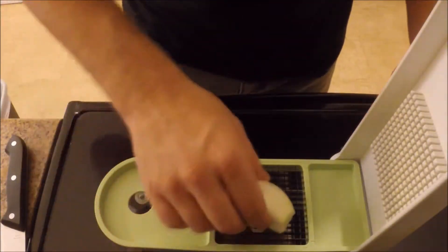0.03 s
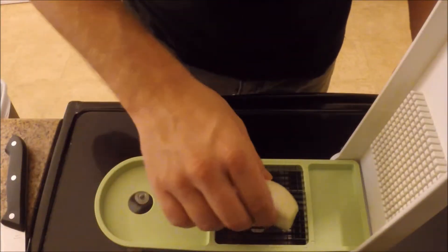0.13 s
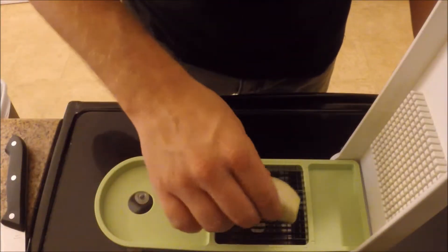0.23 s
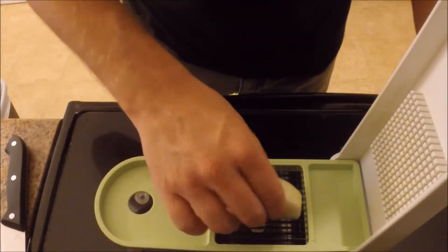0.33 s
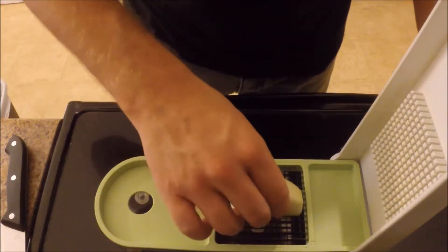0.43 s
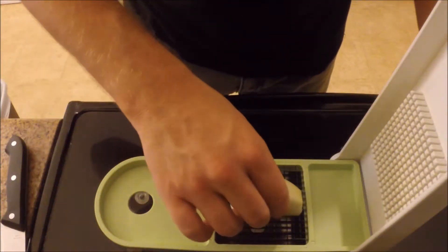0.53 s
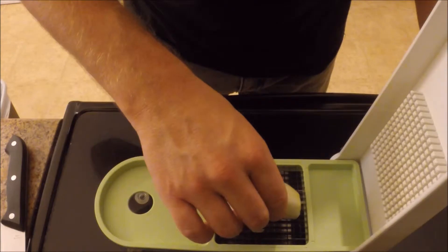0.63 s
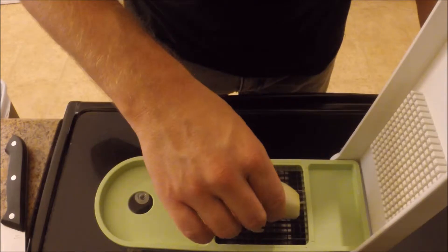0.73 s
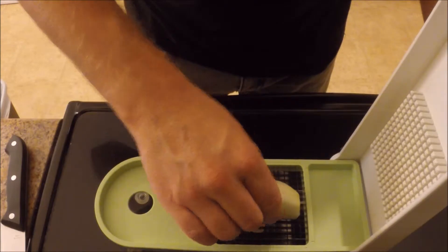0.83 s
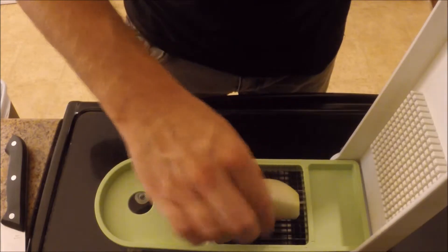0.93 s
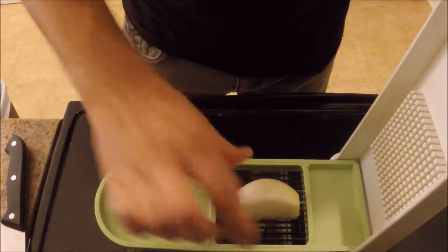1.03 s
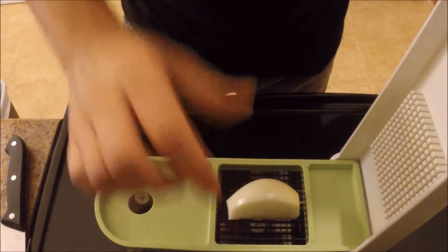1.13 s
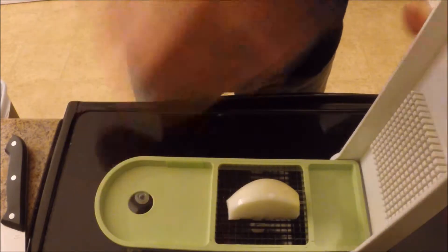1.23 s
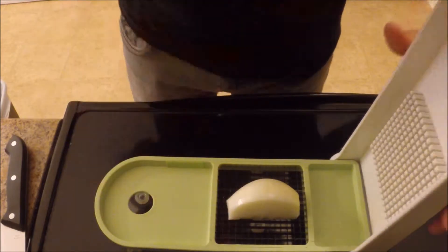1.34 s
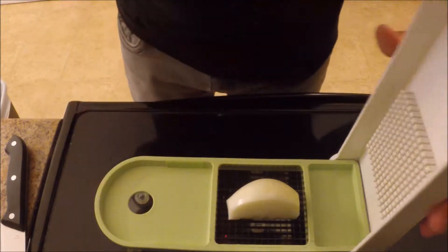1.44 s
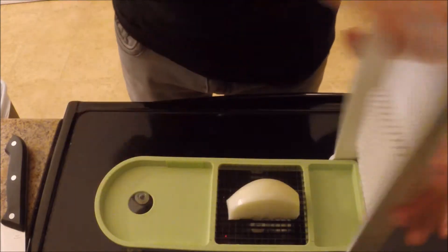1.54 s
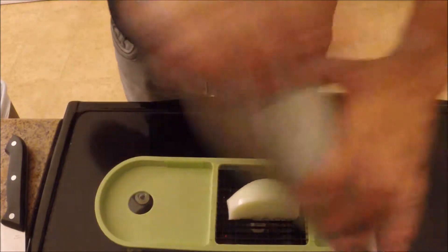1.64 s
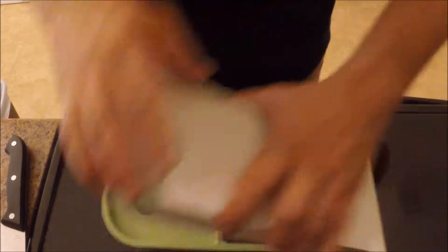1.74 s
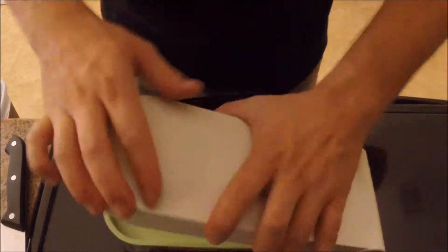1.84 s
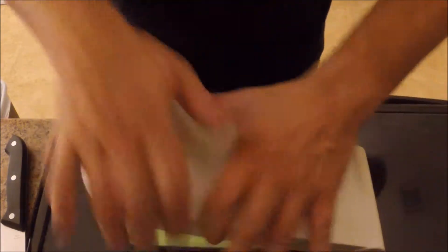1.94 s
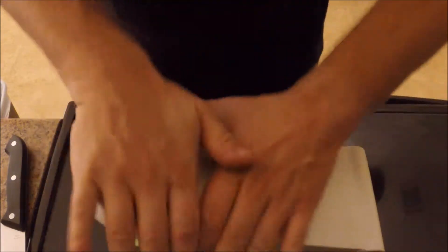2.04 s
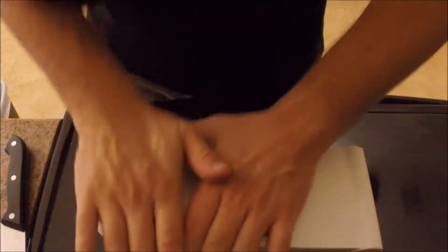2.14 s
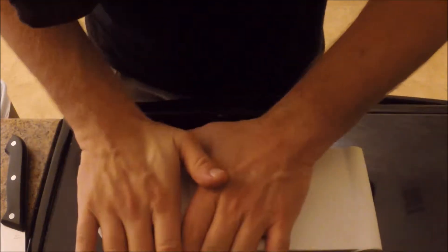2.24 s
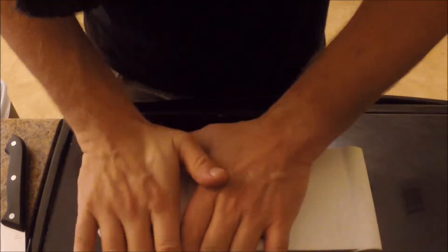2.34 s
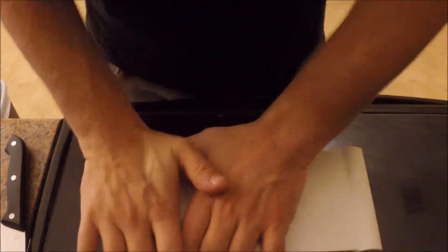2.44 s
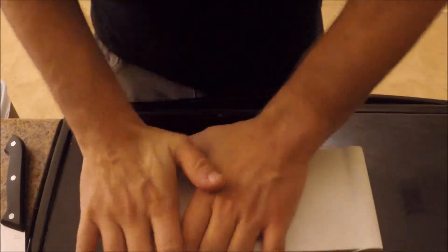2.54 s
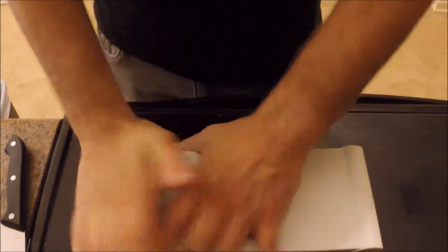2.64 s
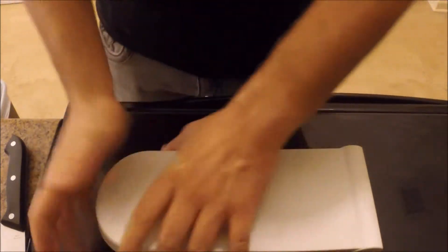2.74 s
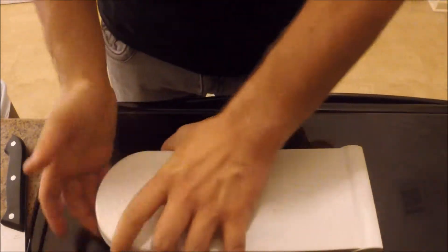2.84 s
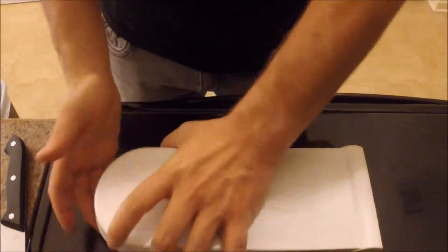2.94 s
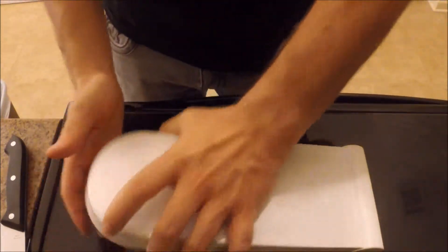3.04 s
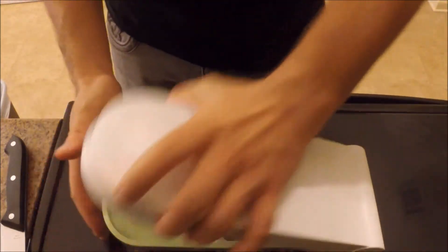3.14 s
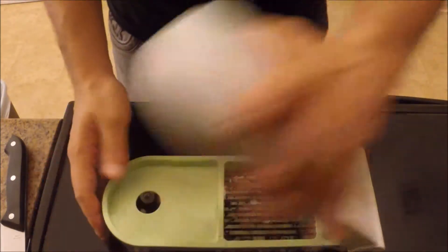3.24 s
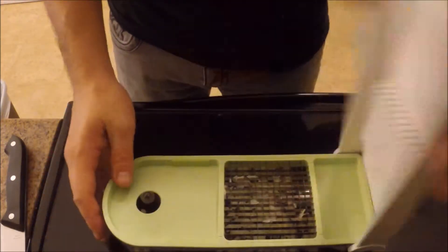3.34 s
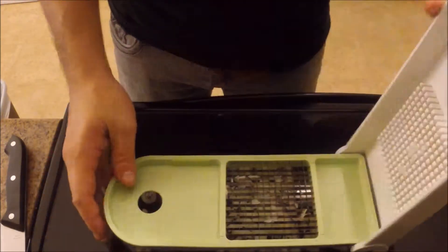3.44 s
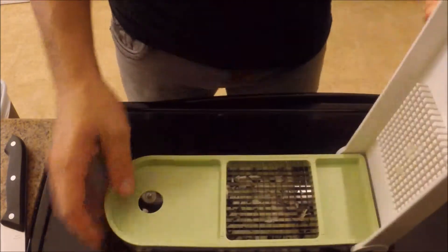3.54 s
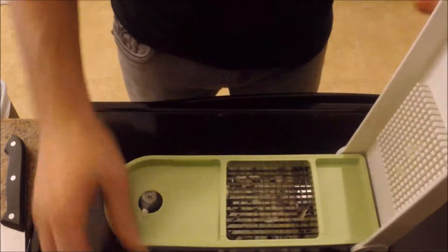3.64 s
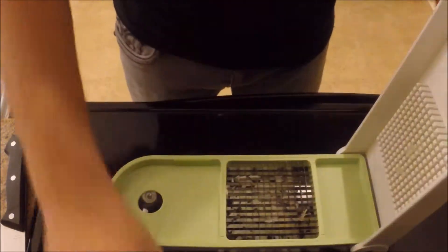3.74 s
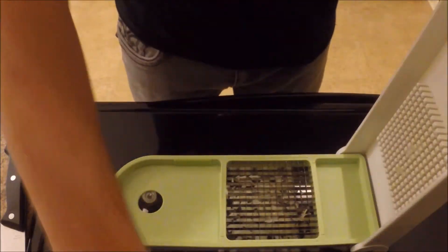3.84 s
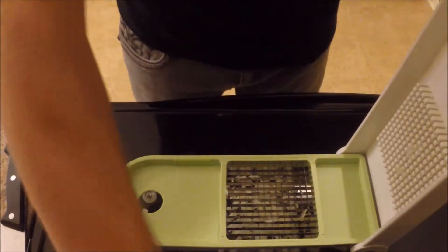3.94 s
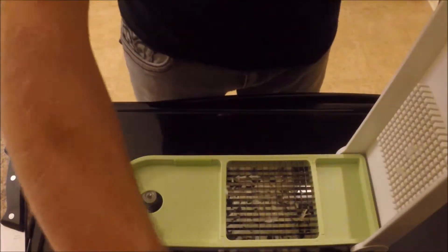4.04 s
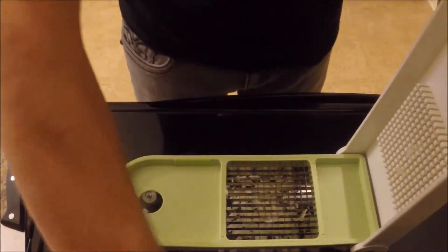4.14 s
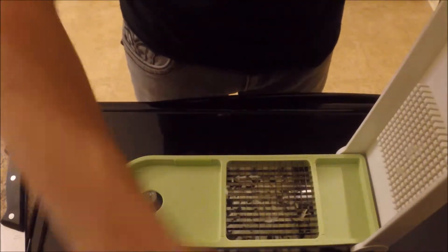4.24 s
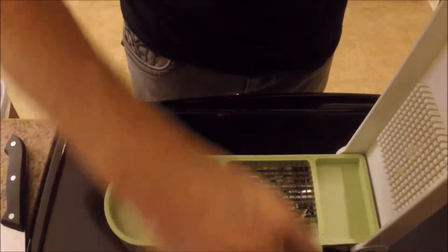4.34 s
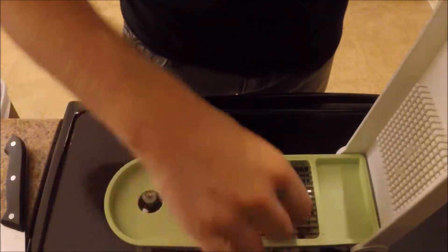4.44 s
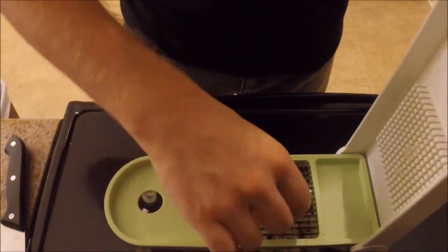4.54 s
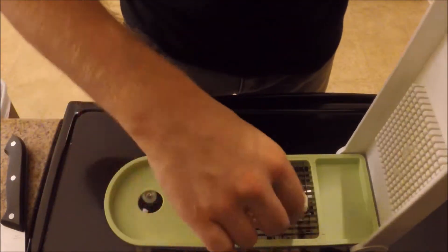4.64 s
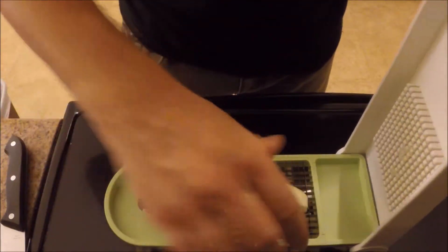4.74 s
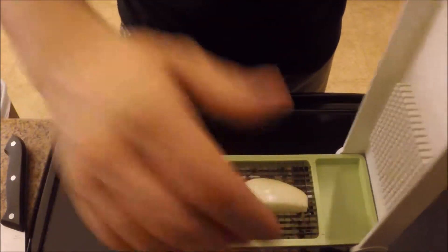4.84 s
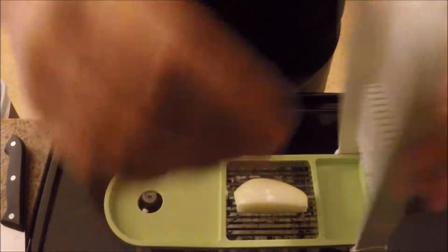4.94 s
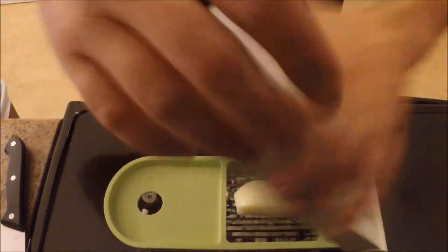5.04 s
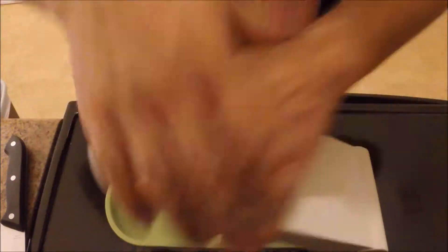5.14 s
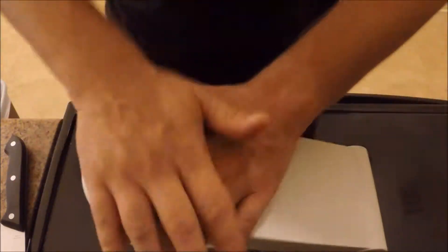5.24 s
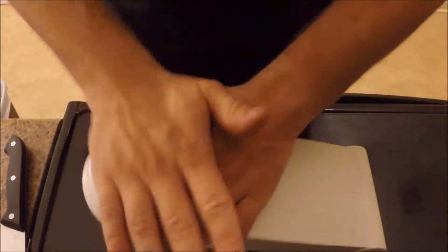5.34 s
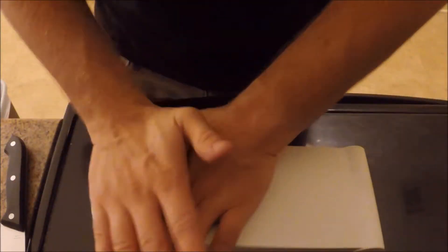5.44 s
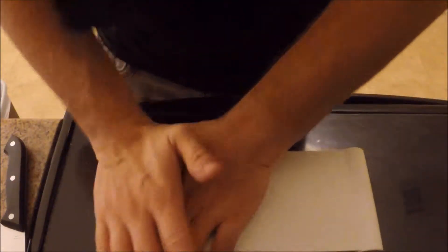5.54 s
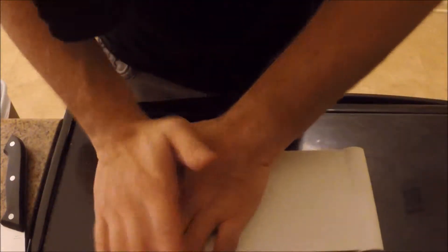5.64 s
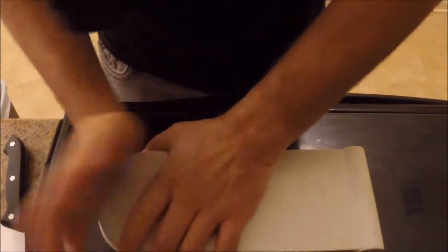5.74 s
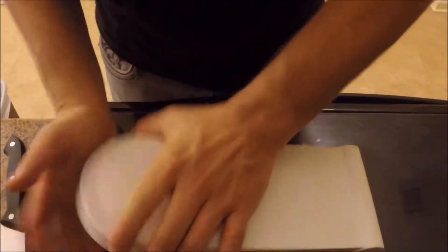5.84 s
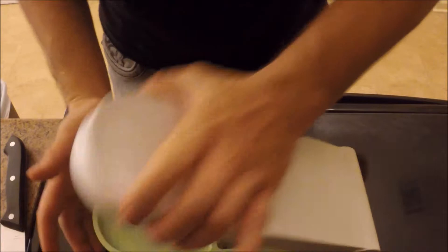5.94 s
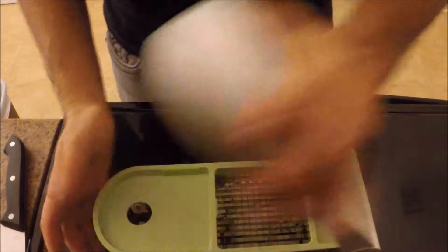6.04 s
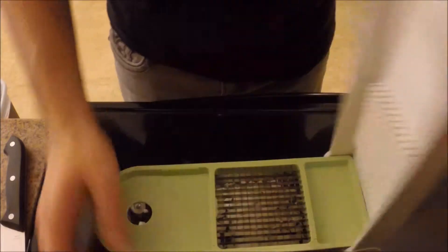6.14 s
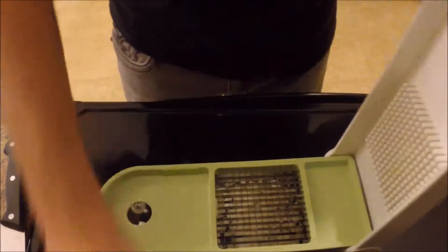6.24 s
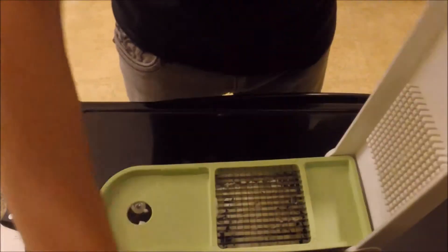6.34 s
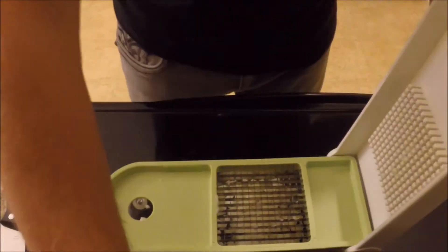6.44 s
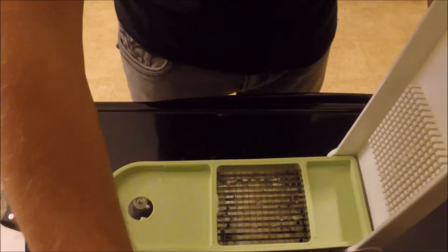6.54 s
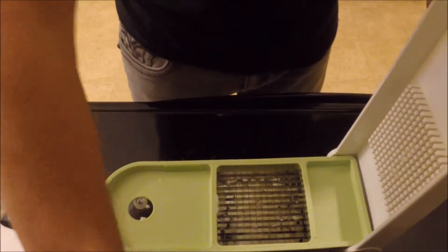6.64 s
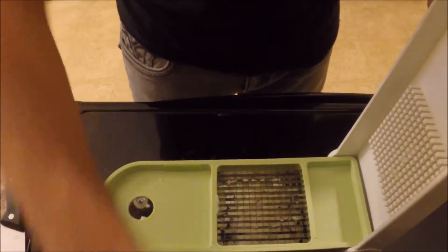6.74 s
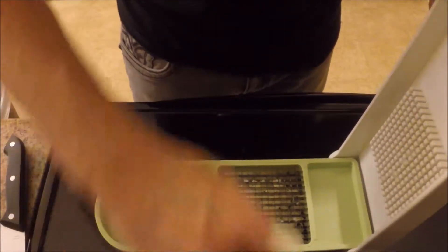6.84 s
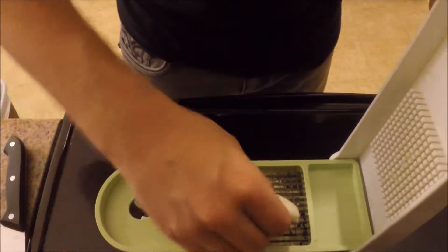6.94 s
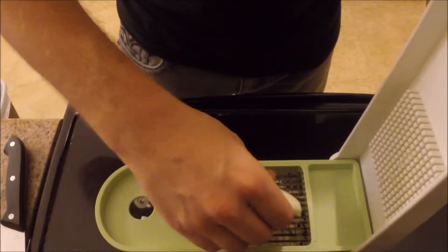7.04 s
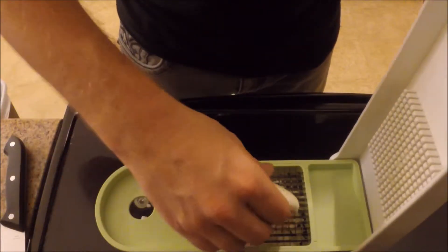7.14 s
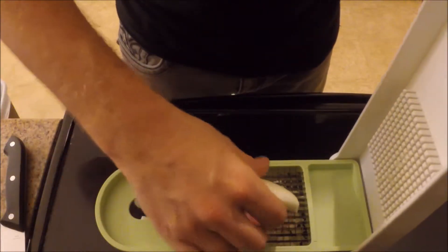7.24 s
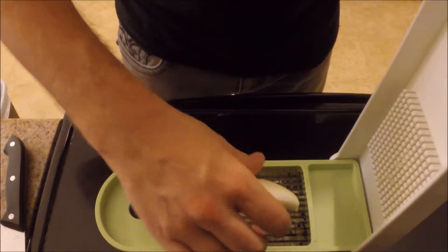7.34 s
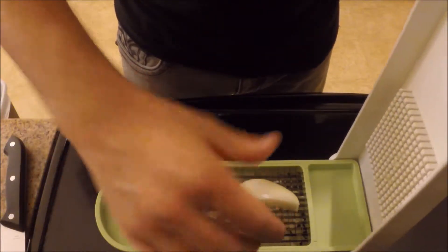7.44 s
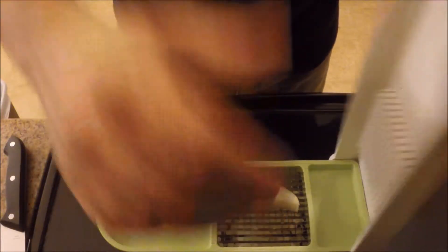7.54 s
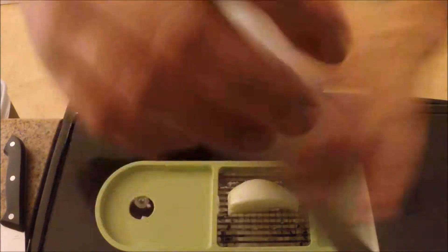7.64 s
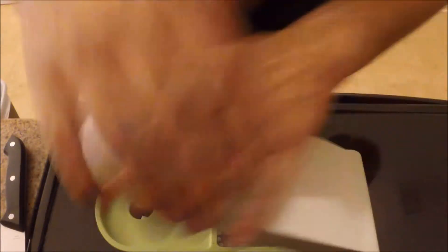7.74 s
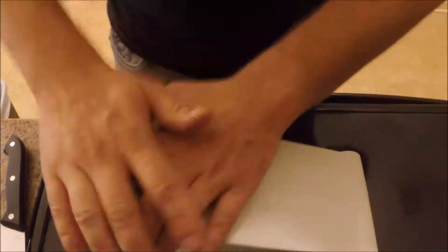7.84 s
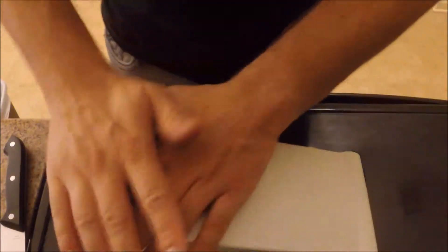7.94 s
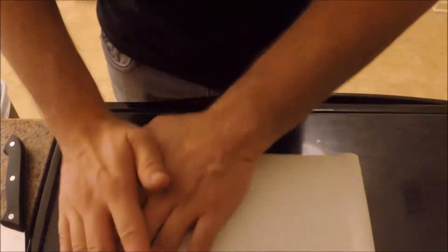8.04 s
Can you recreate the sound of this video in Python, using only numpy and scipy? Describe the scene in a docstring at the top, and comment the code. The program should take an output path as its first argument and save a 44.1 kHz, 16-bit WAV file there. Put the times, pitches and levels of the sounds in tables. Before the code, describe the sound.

Onion crunches through a hand chopper's blades, with plastic clacks, hollow thuds and two sharp lid slams in a small kitchen.

```python
"""First comes a steady kitchen hiss with faint electrical chirps, then a plastic onion chopper ticks.
Its lid clacks in a loose hinge and knocks onto an onion wedge. The flesh crunches through a grid of
blades into a bin, gives way, and the lid slams home, setting the worktop humming. Two wedges are cut
through and a third is begun. A small hard room rings along, and a thin high whine pulses behind it."""
import sys
import numpy as np
from scipy import signal
from scipy.fft import rfft, irfft
from scipy.io import wavfile
from scipy.ndimage import uniform_filter1d

SR = 44100
rng = np.random.default_rng(int(sys.argv[2]) if len(sys.argv) > 2 else 0)


def digitize_waveform(pressure):
    """Quantize a signal to 16-bit integers and store it at the path in sys.argv[1].

    Rows of a 2-D input are taken as channels; values are limited to [-1, 1].
    """
    field = np.atleast_2d(pressure).T
    bounded = np.clip(field, -1, 1)
    quanta = np.round(bounded * 32767).astype(np.int16)
    wavfile.write(sys.argv[1], SR, quanta)


N = 357210
T = np.arange(N) / SR

# A mode is one note that an object rings at; decay_s is the time it takes to fade by 60 dB.
# Chatter is the tiny rattle of two parts meeting. The tone of a noise is its level at each pitch.
# tone of the room's rumble and hiss: pitch_hz, level_db
HISS_TONE = [(8.8, -36.5), (15, -2), (59, -1), (105, -3.5), (149, -1), (182, -3.5), (230, -6), (489, -12),
             (1280, -17.5), (1470, -18), (6120, -30.5), (6680, -31), (8180, -35.5), (10900, -34.5),
             (15500, -47)]
# faint high chirps: start_s, length_s, level_db
CHIRPS = [(.055, .08, -75), (.815, .09, -72), (4.555, 0.094, -74)]
# light ticks of plastic under the hands: start_s, level_db, chatter_s, favoured_hz
TICKS = [(.269, -55, 0.0035, 1100), (1.645, -63, .003, 4400), (2.025, -52, 0.0053, 1700),
         (2.071, -44.5, 0.0079, 1700), (2.089, -40.5, 0.0038, 1700), (2.142, -47, 0.0027, 2100),
         (2.5268, -31.5, .002, 1700), (3.216, -52.5, 0.0056, 1700), (3.349, -54, 0.0024, 1700),
         (3.494, -49.5, 0.0048, 1290), (3.545, -42.5, 0.0029, 2190), (4.836, -56, 0.0033, 1700),
         (5.319, -49, 0.0044, 4950), (6.07, -55.5, 0.0087, 1384), (6.300, -49, 0.0094, 1002),
         (6.384, -55.5, 0.003, 2100), (6.513, -49.5, 0.0029, 1620), (7.586, -53, 0.01, 900),
         (7.73, -52, 0.0063, 1610), (7.979, -48, .008, 1400)]
# modes of the lid and blade grid: pitch_hz, level_db, decay_s
LID_MODES = [(971, -10.5, 0.023), (1214, -6.5, 0.044), (1530, 1, 0.032), (1628, -2.5, 0.055),
             (1910, -3.5, 0.032), (2150, -4.5, 0.033), (2370, -5.5, 0.018), (2690, -7, 0.027),
             (2920, -7.5, 0.016), (3323, -5.5, 0.011), (3560, -3.5, 0.018), (3670, -6, .019),
             (4170, -12, 0.011), (4380, -10.5, .025), (4734, -18, .02), (5355, -7.5, .018),
             (6060, -11.5, 0.02), (7350, -14, 0.02), (8930, -14, 0.023)]
# modes of the hollow base: pitch_hz, level_db, decay_s
BASE_MODES = [(537, -4.5, 0.021), (607, -1, 0.054), (713, -3, 0.074), (780, -4.5, 0.055),
              (868.3, -0.5, 0.11), (1284, -4.5, 0.079), (1324, 3, 0.21), (1463.5, -1.5, 0.082)]
# tone of plastic's dry crack: pitch_hz, level_db
CRACK_TONE = [(150, -2), (500, -21.5), (1050, -4.5), (1700, -1), (2700, -8.5), (3800, -4), (4900, -11),
              (6000, -5.5), (7400, -10), (9500, -14.5), (15000, -32)]
# modes of the worktop: pitch_hz, level_db, decay_s, rise_s
WORKTOP_MODES = [(29.4, -29, 5.2, 0.029), (42.2, -27.5, 2.2, .04), (58, -23.5, 1.2, 0.026),
                 (93.3, -33, 6, 0.054), (107.4, -16, 0.45, 0.011), (138.6, -22, 0.87, 0.032),
                 (153.4, -32, 3.1, .05), (159.8, -14, 1.15, 0.015), (175, -16, 0.9, 0.033),
                 (312, -24, 0.22, 0.0052)]
# how long the kitchen echoes: pitch_hz, decay_s
ROOM_DECAY = [(100, 0.94), (500, 0.12), (2000, 0.7), (6000, 0.67), (14000, 0.39)]
# tone of what the walls send back: pitch_hz, level_db
WALL_TONE = [(100, -1), (170, 7.5), (300, 2), (700, 8.5), (1150, 0), (1650, -2), (2400, -0.5), (4000, -6.5),
             (5300, -4.5), (7500, -7.5), (10000, -10.5), (15000, -4.5)]
# the lid clacks in its loose hinge: start_s, level_db, chatter_s, base_db, favoured_hz, hinge_db
# (base_db and hinge_db are relative to the blow)
CLACKS = [(1.558, -42, 0.0063, -1, 900, -6), (1.605, -42.5, 0.0057, 2, 1600, 0),
          (1.775, -52, 0.0096, -8, 1520, -18.5), (3.439, -41, 0.0096, -2, 853, -14),
          (5.075, -49, 0.0076, 7, 1583, -8), (5.085, -39, 0.0066, -5, 1590, -7.5),
          (5.122, -47, 0.017, 4.5, 1400, -7), (5.248, -49.5, 0.0048, 9.5, 1520, -12),
          (6.166, -42.5, 0.011, -1, 1400, -7), (6.2654, -43.5, 0.0063, 0, 1200, -14),
          (7.78, -45.5, .012, -1, 1330, -8)]
# modes of the open lid's hinge end: pitch_hz, level_db, decay_s
HINGE_MODES = [(1612, 3, .075), (1900, -7.5, 0.061), (2380, -6, 0.064), (3725, -7, .06),
               (4330, -14.5, 0.039), (5770, -16, .03)]
# the lid lands on a fresh wedge: start_s, level_db, chatter_s, base_db, favoured_hz, hinge_db
LANDINGS = [(1.867, -29, 0.006, -5, 1900, -9), (5.2931, -32, 0.0071, -6, 1308, -9),
            (7.7516, -38.5, 0.0085, 3, 1570, -4.5)]
# modes of the bin under the blades: pitch_hz, level_db, decay_s
BIN_MODES = [(158, -8, .07), (214, -9, .05), (312, -.5, 0.085), (368, 1.5, 0.085), (433, -2.5, .06),
             (496, -4.5, .06)]
# the hands bear down on the onion: peak_s, rise_s, hold_s, crunch_db, rasp_db, groan_db, boom_db
SHOVES = [(1.947, 0.033, .025, -70.5, -67, -43, -61.5), (2.17, 0.035, .045, -37.5, -40, -46, -43),
          (2.244, 0.04, 0.052, -44.5, -41, -39, -47), (2.316, .02, 0.0089, -47.5, -43, -47.5, -54.5),
          (2.368, .03, .012, -53.5, -51, -49.5, -61), (2.452, .04, 0.01, -53, -51.5, -57.5, -65),
          (2.495, 0.09, 0.05, -45, -45.5, -55, -61.5), (5.335, 0.071, 0.032, -52.5, -58.5, -48.5, -63),
          (5.483, 0.062, 0.012, -35, -35.5, -37.5, -38.5), (5.511, 0.039, 0.0073, -38.5, -36, -33.5, -31),
          (5.57, .03, .02, -54, -62.5, -43, -45.5), (5.589, 0.012, 0.027, -38, -33, -26.5, -32.5),
          (7.936, 0.12, 0.022, -48, -53, -47, -59), (8.099, 0.11, .02, -35.5, -35.5, -38, -48)]
# tone of crunching onion: pitch_hz, level_db
FLESH_TONE = [(200, -12.5), (650, -5), (1100, -2), (1600, 1.5), (2900, -8.5), (3700, -3.5), (4800, -12),
              (6000, -10), (7300, -14.5), (10000, -22), (15000, -34)]
# modes of the blades, muffled by onion: pitch_hz, level_db, decay_s
BLADE_MODES = [(1270, -6, 0.012), (1460, -0.5, 0.024), (1584, 0.5, 0.018), (1830, -2.5, 0.018),
               (2100, -5, 0.009), (3560, -6.5, 0.0092), (4270, -10, 0.0096), (4390, -15.5, .015),
               (5730, -12, 0.009), (7180, -12, .006)]
# tone of the worktop groaning under load: pitch_hz, level_db
GROAN_TONE = [(50, -7), (110, -4), (158, 10.5), (245, -9.5), (490, -17), (1200, -49.5)]
# a tough layer gives way, so the bin thuds and the blades snap: start_s, thud_db, snap_db
JOLTS = [(2.179, -44.5, -48.5), (2.198, -40.5, -51), (2.221, -42, -51.5), (2.245, -38.5, -52.5),
         (2.265, -41.5, -44.5), (2.312, -49.5, -47), (2.327, -53, -43.5), (5.4929, -26, -43.5),
         (5.5065, -17.5, -37), (5.5223, -17.5, -37), (5.538, -23.5, -45), (5.597, -28, -39),
         (8.094, -29, -40)]
# the lid slams home: start_s, level_db, chatter_s, crack_db (relative to the lid's ring), thud_db
SLAMS = [(2.5291, -11, .0022, -4, -16), (5.6191, -12, .003, -5.5, -26.5)]
# modes of the lid pressed shut on the grid: pitch_hz, decay_s, first_slam_db, second_slam_db
SHUT_LID_MODES = [(983, 0.04, -6.5, -23.5), (1170, 0.051, -3, -6.5), (1242, 0.047, -5, -5.5),
                  (1440, 0.036, -9, -14), (1570, 0.047, 3, 0), (1840, .032, 3, -2.5), (1900, .03, -4, -2.5),
                  (2055, 0.022, -5.5, -7.5), (2432, 0.024, -9, -1.5), (2560, 0.02, -19, -7),
                  (2828, .04, -10.5, -12), (2940, .03, -13.5, -17.5), (3110, 0.035, -14.5, -7.5),
                  (3485, 0.044, -1, -8), (3690, 0.032, -2.5, -7), (4120, 0.034, -5.5, -6.5),
                  (4350, .025, -10, -14.5), (4410, .035, -9.5, -13), (5450, 0.017, -7.5, -6.5),
                  (5730, .022, -7, -11.5), (6160, 0.021, -13.5, -9), (6260, .02, -13, -5.5),
                  (6940, .018, -5, -14), (7240, 0.02, -7, -13.5)]

ROCK_BACK_S = 3.566  # freed from the open lid's pull, the chopper rocks back onto its feet


def gain(db):
    """Turn decibels into a number to multiply by."""
    return 10 ** (np.asarray(db) / 20)


def normalise(x):
    """Scale a sound to an energy of one."""
    return x / np.sqrt(np.sum(x ** 2))


def fade(t, decay_s):
    """Die away smoothly, 60 dB down at decay_s."""
    return np.exp(-np.log(1000) * t / decay_s)


def lookup(hz, points):
    """Read between (pitch_hz, value) points, giving each octave equal room."""
    pitches, values = np.transpose(points)
    return np.interp(np.log(hz + 1), np.log(pitches), values)


def wander(times):
    """A curve that drifts to a new random value at each of the times."""
    return np.interp(T, times, rng.standard_normal(len(times)))


def colour(x, tone, size=8192):
    """Filter a sound to give it a tone."""
    gains = gain(lookup(np.fft.rfftfreq(size, 1 / SR), tone))
    # folding the cepstrum (the log spectrum, turned into time) keeps the filter from ringing early
    cepstrum = irfft(np.log(gains))
    cepstrum[1:size // 2] *= 2
    cepstrum[size // 2 + 1:] = 0
    return excite(x, irfft(np.exp(rfft(cepstrum))))


def excite(force, response):
    """Let every push in the force set off its own copy of the response."""
    return signal.fftconvolve(force, response)[:len(force)]


def add(track, start_s, sound):
    """Mix a sound into the track at start_s."""
    i = int(start_s * SR)
    track[i:i + len(sound)] += sound[:N - i]


def flurry(envelope, smooth_bins):
    """Many random contacts that follow a loudness curve, evened out from bass to treble."""
    contacts = rng.standard_normal(len(envelope)) * envelope
    power = uniform_filter1d(np.abs(rfft(contacts)) ** 2, size=smooth_bins)
    hz = np.fft.rfftfreq(len(contacts), 1 / SR)
    return normalise(colour(contacts, np.column_stack([hz + 1, -10 * np.log10(power)])))


def ring(modes, t, scatter_db=2.5, detune_per_khz=0, damping=1):
    """A struck object's fading notes; each point of contact shifts their levels and can bend them."""
    weight, bend = rng.standard_normal((len(modes), 2)).T
    out = np.zeros(len(t))
    for k, (hz, db, decay_s) in enumerate(modes):
        bent_hz = hz * (1 + detune_per_khz * hz / 1000 * bend[k])
        note = normalise(np.sin(2 * np.pi * bent_hz * t) * fade(t, decay_s / damping))
        out += (-1) ** k * gain(db + scatter_db * weight[k]) * note  # neighbours swing opposite ways
    return normalise(out)


def hiss(level_db=-54.5):
    """The room's steady rumble and hiss."""
    return normalise(colour(rng.standard_normal(N), HISS_TONE)) * np.sqrt(N) * gain(level_db)


def chirps(start_hz=6510, glide_hz_per_s=800, octave_db=-7):
    """Thin electrical chirps that rise a little, each with a weaker tone an octave up."""
    out = np.zeros(N)
    for start_s, length_s, db in CHIRPS:
        t = T[:int(length_s * SR)]
        phase = 2 * np.pi * (start_hz + glide_hz_per_s * t / 2) * t
        tone = np.sin(phase) + gain(octave_db) * np.sin(2 * phase)
        add(out, start_s, gain(db) * signal.windows.tukey(len(t)) * tone)
    return out * np.sqrt(2)


def blow(chatter_s, favoured_hz, base_db, bright_hz, swell_share):
    """Plastic meets plastic: a first touch and a brief chatter ring the lid and the hollow base."""
    t = T[:SR // 7]
    swell = 1 - np.exp(-t / (swell_share * chatter_s))
    first_touch = gain(-16) * (t == 0)
    force = first_touch + flurry(swell * np.exp(-t / chatter_s), smooth_bins=14)
    lid = normalise(excite(force, ring(LID_MODES, t, detune_per_khz=0.0021)))  # the grip bends the lid
    base = normalise(excite(force, ring(BASE_MODES, t, detune_per_khz=0.01)))
    # countless short-lived modes merge into a dry crack
    contacts = flurry(swell * fade(t, 0.014 + 4 * chatter_s), smooth_bins=115)
    clack = lid + gain(-3) * normalise(colour(contacts, CRACK_TONE))
    # the point of contact favours one range of pitches
    clack += 0.66 * signal.lfilter(*signal.iirpeak(favoured_hz, Q=5.9, fs=SR), clack)
    # softer contact takes away the treble
    soften = signal.butter(1, min(bright_hz, 0.45 * SR), fs=SR)
    clack = signal.lfilter(*soften, signal.lfilter(*soften, clack))
    return normalise(normalise(clack) + gain(base_db) * base)


def tick(chatter_s, favoured_hz, base_db=-4.5):
    """A light, sudden blow: the longer the contact, the duller it sounds."""
    return blow(chatter_s, favoured_hz, base_db, bright_hz=25 / chatter_s, swell_share=0.45)


def worktop_hum():
    """The slab takes up a push slowly and hums on in a few low notes."""
    t = T[:3 * SR]
    return sum(gain(db) * np.sin(2 * np.pi * hz * t) * fade(t, decay_s) * (1 - np.exp(-t / rise_s))
               for hz, db, decay_s, rise_s in WORKTOP_MODES)


def kitchen_echo(sound, tail_db=-6.5, early_db=-12, early_decay_s=0.23, gap_s=0.0029):
    """Quick echoes off the worktop and cupboards, then a blur in which each octave dies at its own rate."""
    t = T[:SR]
    hz = np.fft.rfftfreq(len(t), 1 / SR)
    arrived = np.clip(t / gap_s - 1, 0, 1)
    longest_fade = fade(t, max(decay_s for _, decay_s in ROOM_DECAY))
    spectrum = rfft(flurry(arrived * longest_fade, smooth_bins=60))
    octaves_hz = 2. ** np.arange(6, 15)
    tail = np.zeros(len(t))
    for centre_hz in octaves_hz:
        band = lookup(hz, list(zip(octaves_hz, octaves_hz == centre_hz)))
        tail += irfft(spectrum * band) * fade(t, lookup(centre_hz, ROOM_DECAY)) / longest_fade
    early = flurry(arrived * fade(t, early_decay_s), smooth_bins=300)
    return excite(sound, colour(gain(tail_db) * tail + gain(early_db) * early, WALL_TONE))


def whine(start_s=1.4, pitch_hz=7330, pulse_hz=5.7, level_db=-83, flicker_db=2):
    """A faint, thin, high tone that pulses unevenly."""
    times = np.linspace(0, T[-1], 60)
    pace_hz = pulse_hz * (1 + 0.37 * wander(times))
    pulses = 2 * np.maximum(np.sin(2 * np.pi * np.cumsum(pace_hz) / SR), 0)
    tone = np.sqrt(2) * np.sin(2 * np.pi * pitch_hz * T)
    return gain(level_db + flicker_db * wander(times)) * pulses * tone * (T > start_s)


def lid_knock(chatter_s, base_db, favoured_hz, hinge_db):
    """A blow on the open lid leaves its hinge end ringing."""
    clack = tick(chatter_s, favoured_hz, base_db)
    return clack + gain(hinge_db) * ring(HINGE_MODES, T[:len(clack)], scatter_db=0.5)


def bin_thuds(slam_lead_s=0.0022):
    """The bin answers each push with the same short note; a longer push makes it duller."""
    # each push: start_s, level_db, length_s
    pushes = [(start_s - slam_lead_s, db, 0.0027) for start_s, *_, db in SLAMS]
    pushes += [(start_s, db - 8.5, 0.0036) for start_s, db, *_ in LANDINGS]
    pushes += [(start_s, db, 0.00074) for start_s, db, _ in JOLTS]
    pushes.append((ROCK_BACK_S, -41, 0.0036))
    t = T[:SR // 5]
    note = sum(gain(db) * np.sin(2 * np.pi * hz * t) * fade(t, decay_s) for hz, db, decay_s in BIN_MODES)
    out = np.zeros(N)
    for start_s, db, length_s in pushes:
        push = np.sin(np.pi * np.minimum(t / length_s, 1)) ** 2
        add(out, start_s, gain(db) * normalise(excite(push, note)) * np.sqrt(SR * 0.0016))
    return out


def bursts(per_s, spread_db):
    """Tiny clicks at random times and of random strength."""
    strength = gain(spread_db * np.minimum(rng.exponential(size=N), 4))
    return (rng.random(N) < per_s / SR) * strength * rng.choice([-1, 1], N)


def shove(peak_s, rise_s, hold_s, climb_db=29.5, ease_db_per_s=32.5, release_db_per_s=260.5):
    """The hands' force builds, eases slowly while the flesh is cut, then falls away."""
    t = T - peak_s
    return gain(climb_db * np.minimum(t, 0) / rise_s
                - ease_db_per_s * np.clip(t, 0, hold_s)
                - release_db_per_s * np.maximum(t - hold_s, 0))


def onion_crunch(jerk_db=2.5, jerks_per_s=130):
    """Onion cells burst in jerks and rasp on the blades; the loaded worktop groans and the bin booms."""
    t = T[:SR // 10]
    jerks = gain(jerk_db * wander(np.arange(2000) / jerks_per_s))
    flesh = normalise(colour(bursts(per_s=1800, spread_db=3) * jerks, FLESH_TONE))
    rasp = normalise(excite(bursts(900, 1.5) * jerks, ring(BLADE_MODES, t, scatter_db=3)))
    groan = normalise(colour(bursts(830, 1), GROAN_TONE))
    base = normalise(excite(bursts(1500, -1.5) * jerks, ring(BASE_MODES, t, scatter_db=-3, damping=4.8)))
    boom = normalise(excite(bursts(900, -0.5), ring(BIN_MODES, t, scatter_db=0.5, damping=3.2)))
    crunch = flesh + gain(-11.5) * base
    out = np.zeros(N)
    for peak_s, rise_s, hold_s, crunch_db, rasp_db, groan_db, boom_db in SHOVES:
        force = shove(peak_s, rise_s, hold_s)
        out += (crunch * gain(crunch_db) + rasp * gain(rasp_db)) * force
        # worktop and bin answer only to real weight, so their sound grows faster than the force
        out += (groan * gain(groan_db) + boom * gain(boom_db)) * force ** 2.1
    return out * np.sqrt(N)


def blade_snap():
    """The blades snap as a tough layer of onion gives way."""
    return blow(chatter_s=0.006, favoured_hz=1200, base_db=-2.5, bright_hz=3000, swell_share=0.98)


def lid_slam(which, chatter_s, crack_db, base_db=-17):
    """The lid's studs rattle into the grid and ring the shut lid and the hollow base."""
    t = T[:SR // 4]
    swell = 1 - np.exp(-t / chatter_s)
    force = flurry(swell * np.exp(-t / chatter_s), smooth_bins=15)
    # where the lid lands decides how loud each mode is
    modes = [(hz, levels_db[which], decay_s) for hz, decay_s, *levels_db in SHUT_LID_MODES]
    lid = normalise(excite(force, ring(modes, t)))
    base = normalise(excite(force, ring(BASE_MODES, t, damping=2.5)))
    contacts = flurry(swell * fade(t, decay_s=0.03), smooth_bins=100)
    crack = normalise(colour(contacts, CRACK_TONE))
    return normalise(normalise(lid + gain(crack_db) * crack) + gain(base_db) * base)


def all_blows(slam_crack_boost_db):
    """Every blow as start_s, level_db, push_db (into the worktop, relative to the blow), sound."""
    for which, (start_s, db, chatter_s, crack_db, _) in enumerate(SLAMS):
        yield start_s, db, -1.5, lid_slam(which, chatter_s, crack_db + slam_crack_boost_db)
    for start_s, db, *settings in LANDINGS:
        yield start_s, db, 1, lid_knock(*settings)
    for start_s, db, *settings in CLACKS:
        yield start_s, db, 3, lid_knock(*settings)
    for start_s, db, *settings in TICKS:
        yield start_s, db, -13, tick(*settings)
    yield ROCK_BACK_S, -42.5, 8, tick(chatter_s=0.0016, favoured_hz=1700)
    for start_s, _, snap_db in JOLTS:
        yield start_s, snap_db, -13, blade_snap()


def clacks_and_hum(slam_crack_boost_db=0):
    """Two tracks: all the blows, and the hum they push into the worktop."""
    clacks, hum, slab = np.zeros(N), np.zeros(N), worktop_hum()
    for start_s, db, push_db, sound in all_blows(slam_crack_boost_db):
        add(clacks, start_s, gain(db) * sound * np.sqrt(SR * 0.014))  # the level counts over 14 ms
        add(hum, start_s, gain(db + push_db) * slab)
    return clacks, hum


def scene():
    """The chopper close by, its worktop and the room around it."""
    clacks, hum = clacks_and_hum()
    chopping = bin_thuds() + onion_crunch()
    # blows sound different toward the rear; front and rear take their own paths round the room
    rear_clacks, _ = clacks_and_hum(slam_crack_boost_db=11)
    room = (kitchen_echo(clacks + chopping) + kitchen_echo(rear_clacks + chopping)) / np.sqrt(2)
    return (clacks + chopping + room + hum + hiss() + chirps() + whine())[None]


def record(dry, top_hz=15400):
    """Flatten any peak beyond full scale, then cut the highest treble."""
    low_pass = signal.ellip(10, 0.2, 85, top_hz, fs=SR, output="sos")
    return signal.sosfilt(low_pass, np.clip(dry, -1, 1))


dry = scene()
out = record(dry)
digitize_waveform(out)
```